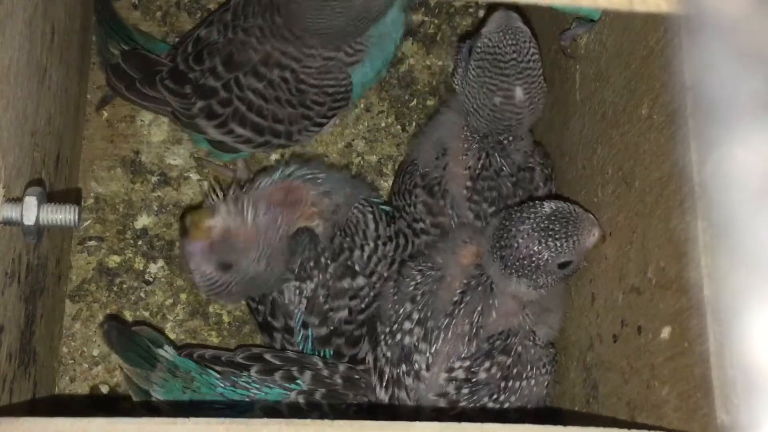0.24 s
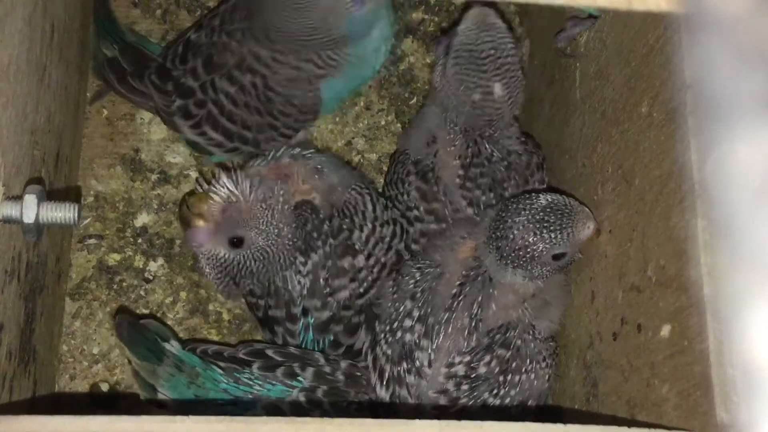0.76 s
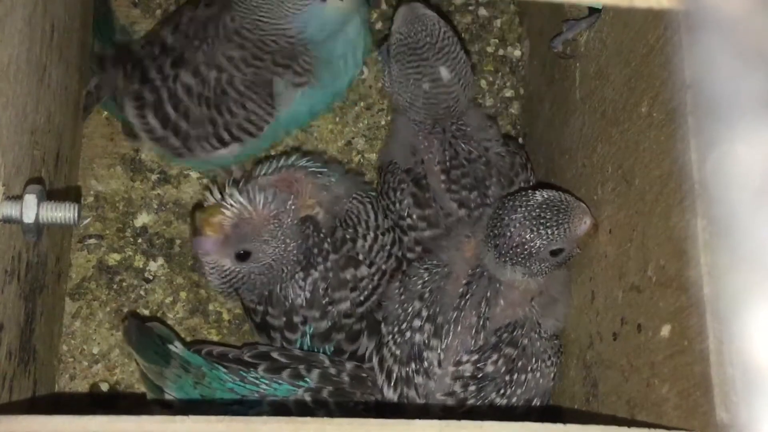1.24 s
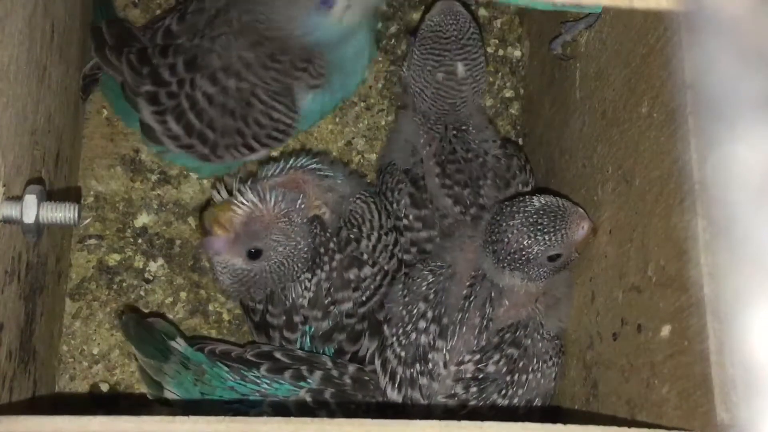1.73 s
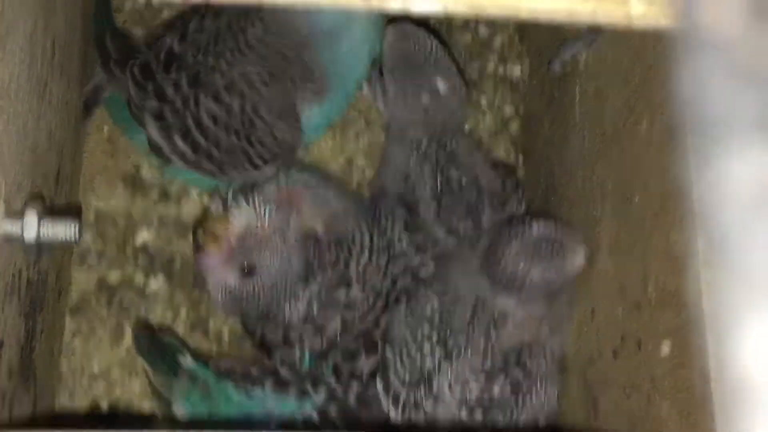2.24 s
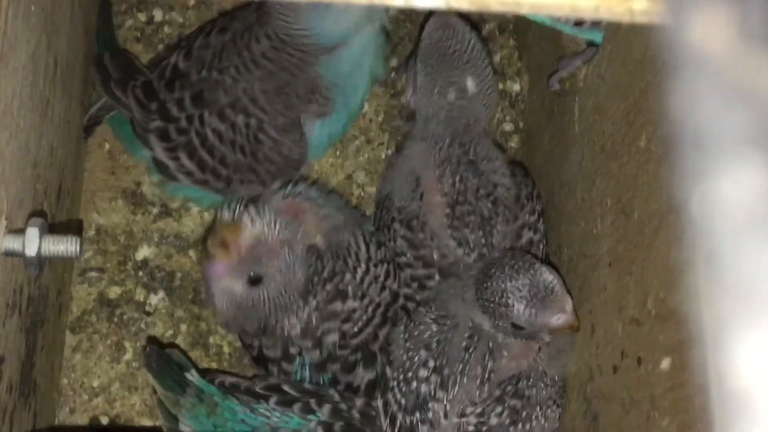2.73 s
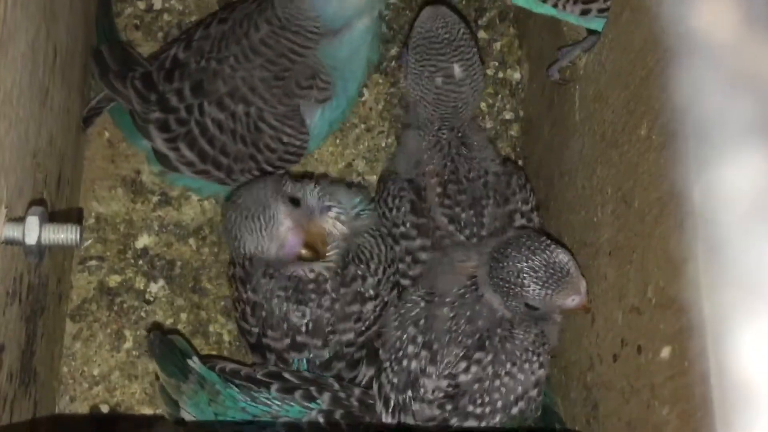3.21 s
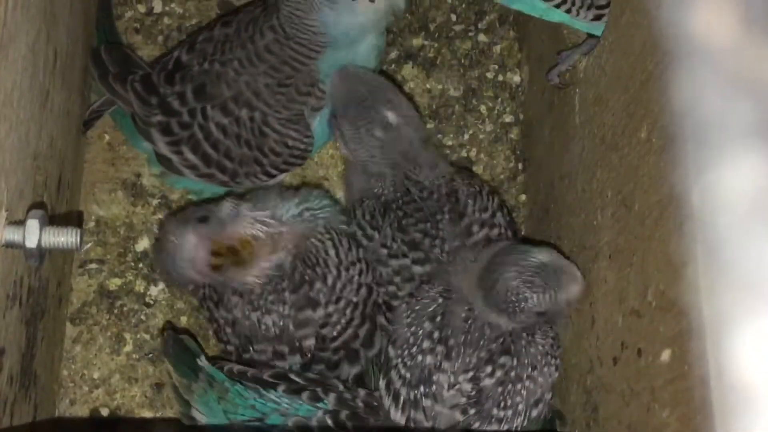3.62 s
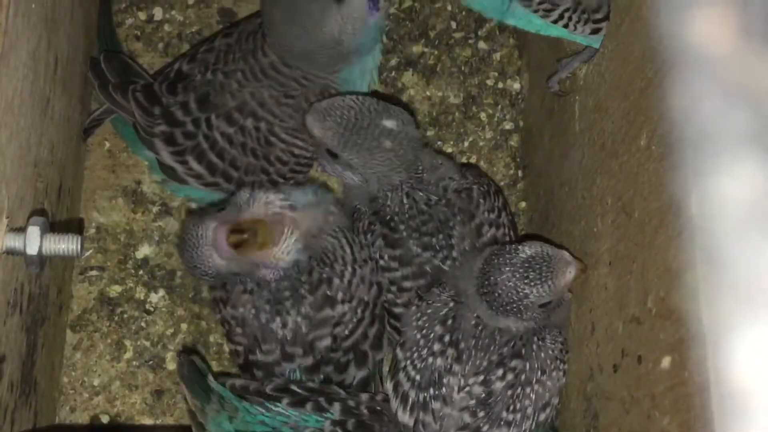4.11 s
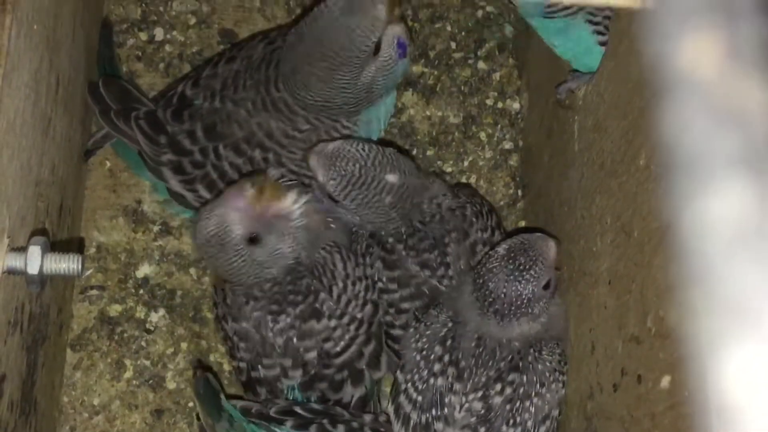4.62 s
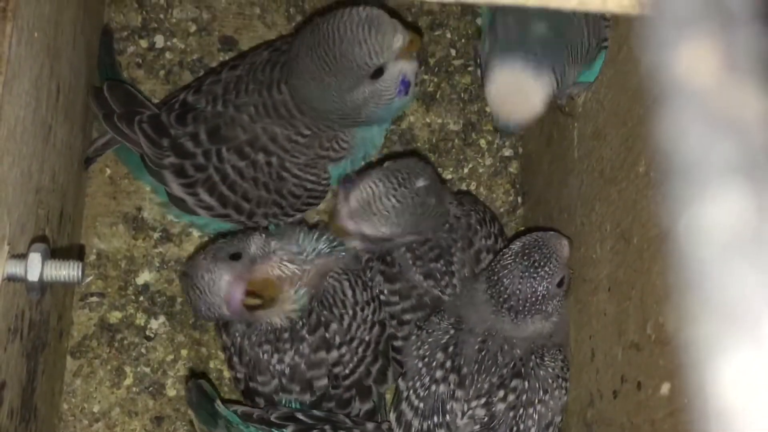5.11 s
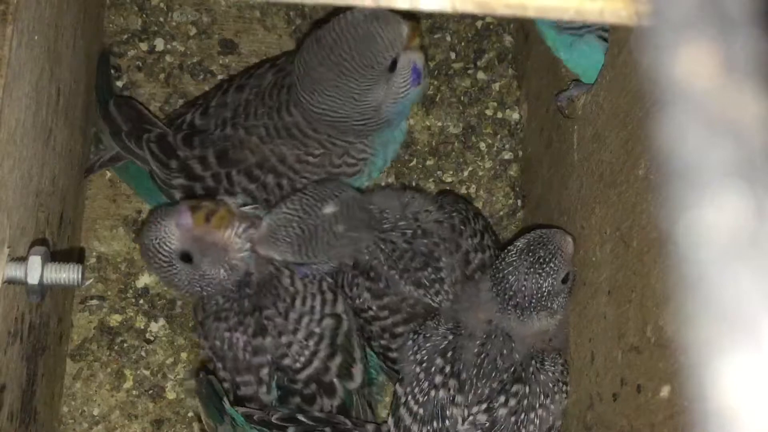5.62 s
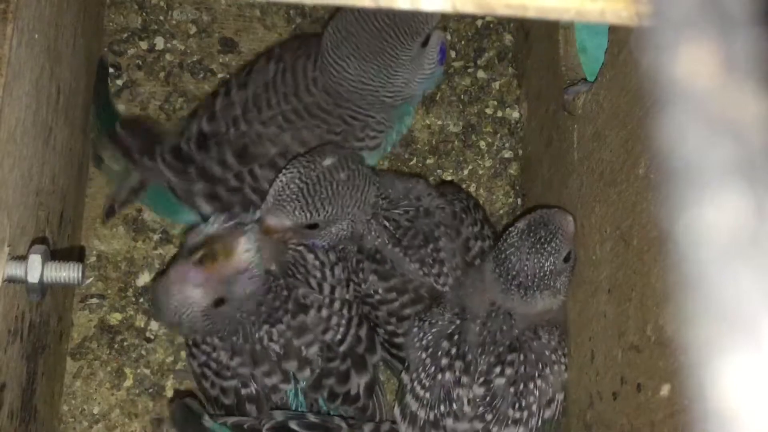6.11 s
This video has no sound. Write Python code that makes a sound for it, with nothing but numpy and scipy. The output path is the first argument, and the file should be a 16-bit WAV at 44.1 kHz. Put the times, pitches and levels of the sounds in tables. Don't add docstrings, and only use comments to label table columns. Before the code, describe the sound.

Close, dry and shrill: two young birds repeat raspy, fluttering whistles that start high, sag and break in pitch, while a third adds short clearer chirps at the start and in the later part. Small beak and claw taps on wood, soft feather brushes and tiny dry cracks slip between the calls. The box gives a short tight echo in a quiet indoor room with faint electrical hum.

```python
import sys
import numpy as np
from scipy import signal
from scipy.fft import rfft, irfft
from scipy.io import wavfile
from scipy.ndimage import uniform_filter1d, minimum_filter1d

SR = 44100
rng = np.random.default_rng(int(sys.argv[2]) if len(sys.argv) > 2 else 0)


def volts_from_db(level):
    exponent = np.asarray(level, float) / 20
    return 10 ** exponent


def store_pcm(level_fs):
    pcm = np.round(np.clip(level_fs, -1, 1) * 32767).astype(np.int16)
    wavfile.write(sys.argv[1], SR, np.atleast_2d(pcm).T)


N = 280035


def colour(points, hz):
    p = np.array(points, float)
    return np.interp(np.log(np.maximum(hz, 1)), np.log(p[:, 0]), p[:, 1])


def walk(rate_hz):
    hold = int(SR / rate_hz)
    w = rng.standard_normal(N // 8)[np.arange(N) // hold]
    w = uniform_filter1d(uniform_filter1d(w, hold), hold)
    return w / w.std()


def filtered(x, order, hz, kind):
    return signal.sosfilt(signal.butter(order, hz, kind, fs=SR, output="sos"), x)


def phrase(calls, breaks, open_hz, sag_s, sag_power, tire_oct_per_s, accent_db, accent_s,
           attack_s, drop_oct, drop_s, waver_semitones, warble):
    edge_s, scallop_s = .003, .023
    t = np.arange(N) / SR
    octave = np.full(N, np.log2(open_hz))
    db, bright, on, fresh, held = np.zeros((5, N))
    for start, length, rest_hz, call_db, bright_db in calls:
        now = slice(max(int(start * SR), 0), int((start + length) * SR))
        age = t[now] - start
        ending = np.clip(1 - (length - age) / drop_s, 0, 1)
        sag = np.exp(-(np.abs(age) / sag_s) ** sag_power)
        tiring = tire_oct_per_s * (age - length / 2)
        octave[now] = np.log2(rest_hz + (open_hz - rest_hz) * sag) - tiring - drop_oct * ending
        accent = accent_db * age / accent_s * np.exp(1 - age / accent_s)
        db[now] = call_db + accent - 7 * ending
        fresh[now] = np.exp(-age / .06)
        bright[now] = bright_db
        on[now] = np.minimum(age / attack_s, 1) ** 2
    octave = octave + waver_semitones * walk(45) / 12
    for start, length, break_hz, change_db in breaks:
        now = slice(max(int((start - edge_s) * SR), 0), int((start + length + edge_s) * SR))
        age = t[now] - start
        share = np.clip(.5 + np.minimum(age, length - age) / (2 * edge_s), 0, 1)
        arches = max(round(length / scallop_s), 1)
        scallop_oct = .13 * (.5 - np.abs(np.sin(np.pi * age / length * arches)))
        target = np.log2(break_hz) - 1.8 * (age - length / 2) + scallop_oct
        octave[now] += share * (target - octave[now])
        db[now] += share * (change_db - 24 * (1 - share))
        held[now] = np.maximum(held[now], share)
    above_oct = octave - np.log2(3000)
    level = on * volts_from_db(db + 4 * above_oct)
    unsteady = warble * (1 - .6 * held) * (1 + .6 * fresh)
    return 2 ** octave, level, bright - 30.5 * above_oct, unsteady


# f/Hz, level/dB
THROAT_RESPONSE = [(2000, -9.5), (2600, -0.5), (3700, 0.5), (4400, -17), (5100, 3.5), (6200, 5),
                   (7500, -8.5), (9500, -15), (12000, -12), (15000, -9.5)]


def chick(voice, trill_hz, flutter_db, hoarse):
    line, level, bright, warble = voice
    line = uniform_filter1d(line, size=70)
    level, bright, warble = (uniform_filter1d(c, size=300, origin=100) for c in (level, bright, warble))
    beat_hz = trill_hz * (line / 3000) ** 1.4 * np.exp(.3 * walk(40))
    beat = 2 * np.pi * np.cumsum(beat_hz) / SR
    urge = np.sin(beat) + .45 * walk(120) + np.minimum(warble, 1) - line / 2150
    plunge = .5 + .5 * np.tanh(2.7 * urge)
    bottom = np.clip(2380, .8 * line, .93 * line)
    top = line * 2 ** (warble * (.5 + .8 * walk(200)) / 12)
    hz = (top + (bottom - top) * plunge) * (1 + .00642 * walk(900))
    phase = 2 * np.pi * np.cumsum(hz) / SR
    slope = np.gradient(np.log2(uniform_filter1d(hz, size=40)))
    jump_oct_per_s = SR * uniform_filter1d(np.abs(slope), size=40)
    choke = volts_from_db(-.0136 * jump_oct_per_s)
    pulse = volts_from_db(flutter_db * (np.minimum(walk(500), 1.2) + .34 * np.cos(2 * beat)))
    steady = uniform_filter1d((choke * pulse) ** 2, size=2500) ** .5
    effort = level * choke * pulse / steady
    out, gust, slip = 0, walk(3000), walk(1800)
    for k in range(1, 8):
        db = .93 * colour(THROAT_RESPONSE, k * hz)
        if k < 3:
            db = db - .63 * colour(THROAT_RESPONSE, k * line) + (k - 1) * bright
        else:
            db = db + .87 * np.minimum(bright, 4.0) - .66 * k
            db = db + 7.8 * .36 * (k - 2) * np.log(choke)
            db = db + 1.6 * walk(130) + 2.76 * walk(25)
        smear, lag = hoarse * k ** 2.56, N // (k + 1)
        tone = np.sin(k * phase + smear * np.roll(slip, lag))
        out = out + volts_from_db(db) * (1 + smear * np.roll(gust, lag)) * tone * (k * hz < .36 * SR)
    half_cycle = np.sin(phase / 2) + 4 * np.sin(3 * phase / 2)
    out = out + volts_from_db(-32) * np.maximum(walk(30) - 1.2, 0) * half_cycle
    return filtered(1.523 * effort * out, 5, 2000, "high")


# t/s, length/s, resting f/Hz, level/dB, second overtone re first/dB
WARBLER_CALLS = [
    (-.08, .292, 3360, -27, 8),
    (.418, 0.58, 3600, -29, 7.3),
    (1.295, 0.5, 3771, -27, 4.1),
    (1.88, 0.47, 3208, -28, 10.4),
    (2.714, .45, 3380, -28.5, 9),
    (3.615, 0.45, 3600, -24, 4.5),
    (4.36, 0.43, 3461, -23.5, 3),
    (5.28, 0.46, 3450, -27.5, 11.7),
    (6.025, .34, 3698, -23, 1.58),
]
# t/s, length/s, f/Hz, level change/dB
WARBLER_BREAKS = [(0, 0.027, 3315, -8), (.021, .045, 3823, 5), (0.07, 0.019, 3086, 3),
                  (.475, 0.043, 2630, 7), (.547, 0.026, 2568, 3.5), (0.588, .06, 2573, 5),
                  (0.672, 0.026, 2543, 4.5), (.72, 0.061, 2527, 3), (.807, 0.03, 2550, 0),
                  (.855, 0.031, 2605, -2.5), (0.947, 0.019, 2527, 1), (1.339, 0.06, 2707, 4),
                  (1.418, 0.027, 2635, 7), (1.459, 0.063, 2624, 5.5), (1.544, 0.028, 2503, 0.5),
                  (1.6, 0.069, 2676, 1), (2.135, 0.027, 3062, 2), (2.165, 0.085, 3512, -0.5),
                  (2.308, .055, 2161, -13.5), (2.741, 0.12, 3760, -1), (2.88, 0.061, 3920, 4.5),
                  (3.7, .04, 3910, 0.5), (3.817, 0.059, 3890, 0.5), (3.142, .04, 2536, -5),
                  (3.995, .045, 2919, 0), (4.025, .05, 2553, 3.5), (4.451, .05, 3943, 3),
                  (6.085, 0.043, 2611, 0.5), (6.16, .025, 2658, 0), (6.205, .05, 2532, -0.5)]


def warbler_phrase():
    return phrase(WARBLER_CALLS, WARBLER_BREAKS, open_hz=4496, sag_s=.06, sag_power=.74,
                  tire_oct_per_s=.15, accent_db=4.5, accent_s=.016, attack_s=.019,
                  drop_oct=.3, drop_s=.047, waver_semitones=.96, warble=.52)


# t/s, length/s, resting f/Hz, level/dB, second overtone re first/dB
TRILLER_CALLS = [
    (.226, 0.36, 3015, -27.5, 9),
    (.698, 0.7, 3250, -26.5, 4),
    (1.692, 0.39, 2950, -25, 5.5),
    (2.645, 0.37, 2950, -24.5, 4),
    (3.523, 0.38, 2862, -26, 4.5),
    (4.221, .627, 2900, -25, 5.5),
    (5.03, .722, 2850, -25, 5),
    (5.843, 0.47, 2900, -24, 5),
]
# t/s, length/s, f/Hz, level change/dB
TRILLER_BREAKS = [(0.258, .012, 2701, -12), (.889, .04, 3600, -3), (0.967, .108, 3514, 6.5),
                  (1.109, .046, 3362, -1.5), (1.155, 0.046, 3044, -5), (1.209, .012, 2600, 0),
                  (1.239, .012, 2600, 0.5), (1.294, .03, 2793, -2), (1.733, 0.04, 3306, -3),
                  (1.788, 0.074, 3365, -4.5), (3.74, .04, 3294, 8.5), (3.79, .022, 2600, 2.5),
                  (4.258, 0.089, 3080, -1.5), (4.424, .025, 2616, 6), (4.527, .054, 2637, 4.5),
                  (4.597, .035, 2630, 0.5), (4.684, .035, 2596, -2), (4.736, .016, 2609, -0.5),
                  (4.758, 0.067, 2925, -3.5), (5.349, .022, 2530, 10), (5.451, .05, 2565, 4.5),
                  (5.492, 0.036, 3465, 1.5), (5.522, .021, 2600, 4), (5.542, 0.021, 3213, -8),
                  (5.564, .058, 2510, 0), (5.631, 0.03, 3445, -11), (5.646, 0.028, 2605, 4),
                  (5.693, .04, 3109, -5.5), (6.239, .07, 2550, -5.5), (6.331, 0.015, 2600, 5)]


def triller_phrase():
    return phrase(TRILLER_CALLS, TRILLER_BREAKS, open_hz=3645, sag_s=.062, sag_power=3.0,
                  tire_oct_per_s=.25, accent_db=8.5, accent_s=.016, attack_s=.014,
                  drop_oct=.12, drop_s=.025, waver_semitones=.32, warble=.6)


# t/s, length/s, resting f/Hz, level/dB, second overtone re first/dB
BACK_CHICK_CALLS = [
    (.226, .16, 3608, -21.5, 1.5),
    (1.07, 0.099, 3367, -18.5, 5),
    (1.735, 0.13, 3593, -24, 10.5),
    (4.109, 0.25, 3400, -21, -14.5),
    (4.855, .345, 3403, -23, -2),
    (5.786, 0.23, 3425, -21, 1.5),
]


def back_phrase():
    return phrase(BACK_CHICK_CALLS, [], open_hz=3600, sag_s=.058, sag_power=3.0,
                  tire_oct_per_s=.14, accent_db=-7, accent_s=.022, attack_s=.0033,
                  drop_oct=.013, drop_s=.0254, waver_semitones=.11, warble=.3)


# f/Hz, level/dB
MAINS_LINES = [(120, -67), (180, -66.5), (240, -65), (300, -86), (420, -76)]
# f/Hz, level/dB per Hz
ROOM_AIR = [(60, -29.5), (110, -10), (200, -0.5), (300, 2.5), (480, -6), (760, -2.5), (900, -6), (1260, -6),
            (1900, -2.5), (2600, -16), (6000, -45.5), (12000, -62.5)]


def room_tone():
    hz = np.arange(N // 2 + 1) * SR / N
    air = irfft(rfft(rng.standard_normal(N)) * volts_from_db(colour(ROOM_AIR, hz)), N)
    air = air / air.std() * volts_from_db(-60 + .67 * walk(25))
    t = np.arange(N) / SR
    return air + sum(np.sqrt(2) * volts_from_db(db) * np.sin(2 * np.pi * f * t + f) for f, db in MAINS_LINES)


# f/Hz, level/dB
MOTOR_TONES = [(483, -71.5), (760, -71), (1265, -76.5), (1780, -72)]


def motor_whine():
    t = np.arange(N) / SR
    return sum(volts_from_db(db + 4 * walk(4)) * np.sin(2 * np.pi * hz * t + 1.4 * walk(28))
               for hz, db in MOTOR_TONES)


def echoes(x, db, t60_s):
    t = np.arange(SR // 2) / SR
    tail = uniform_filter1d(rng.standard_normal(len(t)), size=3) * np.exp(-np.log(1000) * t / t60_s)
    return volts_from_db(db) * signal.fftconvolve(x, tail / np.sqrt(np.sum(tail ** 2)))[:N]


# f/Hz, level/dB
BOX_RESPONSE = [(3900, -1), (4450, -0.5), (4900, -3.5), (8000, 0.5), (8700, 3.5), (9500, -0.5)]


def nest_box(near):
    hz = np.arange(N // 2 + 1) * SR / N
    return irfft(rfft(near + echoes(near, -12.5, t60_s=.055)) * volts_from_db(colour(BOX_RESPONSE, hz)), N)


# t/s, level/dB
WALL_TAPS = [
    (1.076, -44.5),
    (2.315, -35),
    (3.455, -24),
    (5.4154, -32),
    (5.8964, -38),
    (6.121, -42),
    (6.3105, -42),
]


def wall_taps():
    t, out = np.arange(6000) / SR, np.zeros(N + 6000)
    for s, db in WALL_TAPS:
        ring = np.sin(2 * np.pi * 1250 * t) * np.exp(-t / .0063)
        thud = .88 * rng.standard_normal(len(t)) * np.exp(-t / .0035)
        out[int(s * SR):int(s * SR) + len(t)] += volts_from_db(db) * (ring + thud)
    return out[:N]


# t/s, length/s, centre f/Hz, level/dB
FEATHER_BRUSHES = [
    (1.171, 0.023, 250, -51),
    (2.18, 0.091, 436.4, -61),
    (2.756, 0.076, 456, -58),
    (3.779, 0.067, 440, -53),
    (3.9, 0.26, 434, -58.5),
    (4.848, 0.16, 508, -60.5),
    (5.2, .33, 500, -59),
    (5.903, 0.26, 454.5, -58.5),
]


def feather_rustles():
    out = np.zeros(N + SR)
    for s, length, hz, db in FEATHER_BRUSHES:
        n = int(length * SR)
        grains = rng.standard_normal(SR // 2) ** 3
        band = filtered(grains, 2, [hz / 1.25, hz * 1.25], "band")[:n]
        out[int(s * SR):int(s * SR) + n] += volts_from_db(db) * np.hanning(n) ** .5 * band / band.std()
    return out[:N]


# t/s, level/dB
HUSK_CRACKS = [
    (2.424, -39.5),
    (2.621, -37),
    (2.632, -40),
    (2.642, -18),
    (3.221, -45),
    (3.317, -41),
    (3.408, -51),
]


def husk_cracks():
    out = np.zeros(N + SR)
    for s, db in HUSK_CRACKS:
        crack = rng.standard_normal(600) * np.exp(-np.arange(600) / SR / .002)
        out[int(s * SR):int(s * SR) + 600] += volts_from_db(db) * filtered(crack, 3, [9500, 13000], "band")
    return out[:N]


# t/s, level/dB
CLAW_TICKS = [
    (2.5715, -36.5),
    (3.4548, -34),
]


def claw_ticks():
    t, out = np.arange(6000) / SR, np.zeros(N + 6000)
    for s, db in CLAW_TICKS:
        tick = np.diff(rng.standard_normal(len(t) + 1)) * np.exp(-t / .0031)
        out[int(s * SR):int(s * SR) + len(t)] += volts_from_db(db - 3.5) * tick
    return out[:N]


def scene():
    trill, warble, back = triller_phrase(), warbler_phrase(), back_phrase()
    near = chick(trill, trill_hz=100, flutter_db=3.7, hoarse=.014)
    near = near + chick(warble, trill_hz=60, flutter_db=2.9, hoarse=.012)
    near = near + filtered(chick(back, trill_hz=70, flutter_db=3.5, hoarse=.012), 1, 5500, "low")
    near = near + filtered(wall_taps() + claw_ticks(), 2, 800, "high")
    room = nest_box(near) + echoes(near, -30, t60_s=.45) + room_tone()
    return (room + feather_rustles() + husk_cracks() + motor_whine())[None]


def roll_off(x):
    return signal.sosfilt(signal.butter(12, 16480, fs=SR, output="sos"), x)


def record(dry):
    gain = minimum_filter1d(np.minimum(.86 / (np.abs(dry) + 1e-9), 1), size=161)
    cut = filtered(dry * uniform_filter1d(gain, size=81), 5, 88, "high")
    cut = signal.sosfilt(signal.cheby2(10, 60, 16300, fs=SR, output="sos"), cut)
    return roll_off(cut)


dry = scene()
out = record(dry)
store_pcm(out)
```